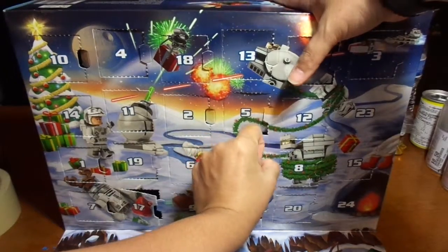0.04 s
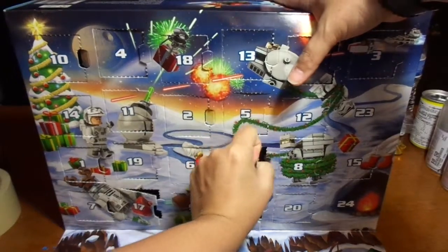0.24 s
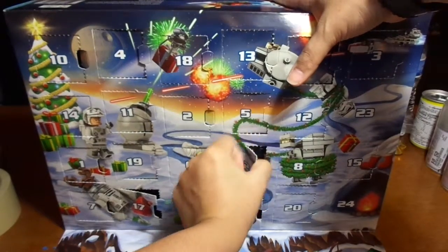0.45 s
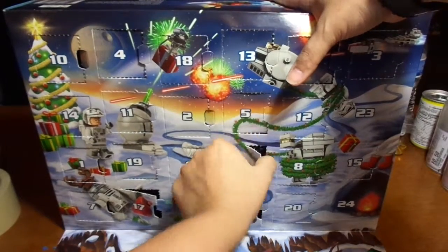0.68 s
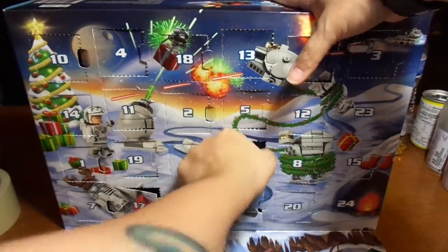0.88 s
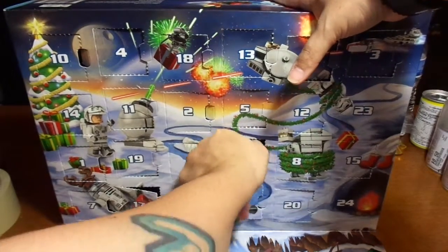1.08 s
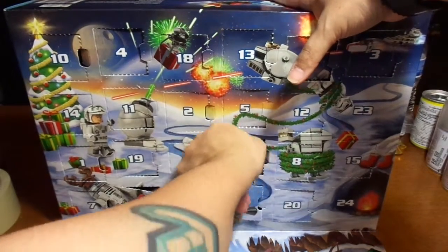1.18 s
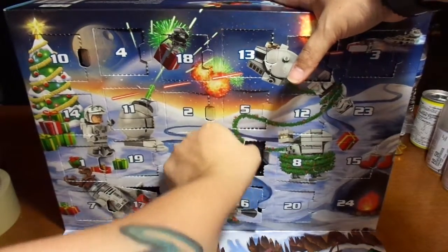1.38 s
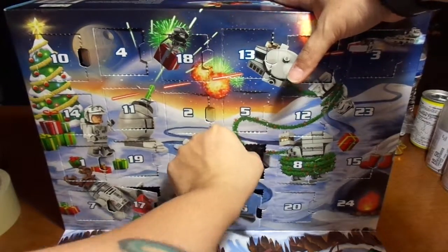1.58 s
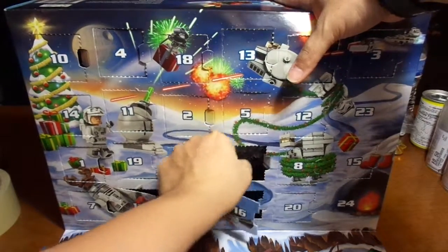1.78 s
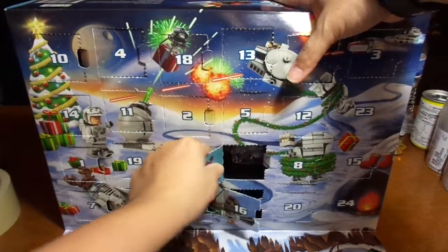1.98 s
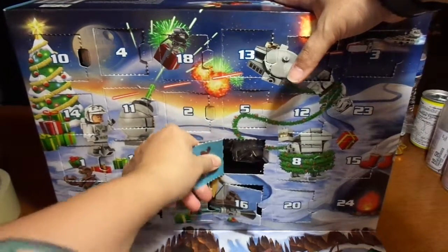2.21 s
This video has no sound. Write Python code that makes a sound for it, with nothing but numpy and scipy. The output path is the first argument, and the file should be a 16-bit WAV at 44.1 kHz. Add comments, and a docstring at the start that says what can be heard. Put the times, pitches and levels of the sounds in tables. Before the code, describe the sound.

A perforated cardboard flap is pressed in and torn open with sharp snaps and crackles.

```python
"""Over room tone and microphone hiss, a finger rustles on a cardboard box and, near 0.2 s, presses in its
perforated door with a cluster of loud snaps. Each breaking tab is a few milliseconds of fibre clicks
that excite the resonances of the flap and the hollow box. Faint ticks and rubbing follow; from about
1.5 s the door tears open tab by tab, and after 2 s only light ticks and rustle remain.
One microphone hears it all in a quiet room."""
import sys
import numpy as np
from scipy import signal
from scipy.fft import rfft, irfft, next_fast_len
from scipy.io import wavfile
from scipy.ndimage import uniform_filter1d

SR = 44100
rng = np.random.default_rng(int(sys.argv[2]) if len(sys.argv) > 2 else 0)


def pcm_store(signal):
    """Save signal as 16-bit PCM."""
    levels = np.round(np.clip(np.atleast_2d(signal), -1, 1) * 32767)
    wavfile.write(sys.argv[1], SR, levels.astype(np.int16).T)


N = 99225
FIBRE_CLICKS_PER_S, RUB_GRAINS_PER_S = 3700, 3000
BOOM_T60_S, CRACK_T60_S, HISS_T60_S, RIP_T60_S, ROOM_T60_S = 0.039, 0.012, 0.011, 0.19, 0.28
CARD_LOW_HZ, WALL_CUT_HZ, RUMBLE_CUT_HZ, CUTOFF_HZ = 223.4, 2700, 48, 15150


def amp(db):
    """Amplitude grows tenfold every 20 dB."""
    return 10 ** (np.asarray(db) / 20)


def rms_one(x):
    """Normalisation to unit mean power."""
    return x / np.sqrt(np.mean(x ** 2) + 1e-20)


def peak_one(x):
    """Normalisation: the loudest 1.5 ms gets the power of a unit sine."""
    return x / np.sqrt(2 * uniform_filter1d(x ** 2, size=66).max() + 1e-20)


def band(x, low_hz, high_hz):
    """Band-pass filtering attenuates what lies beyond two edges."""
    edges = [low_hz, min(high_hz, .45 * SR)]
    return signal.sosfilt(signal.butter(2, edges, "band", fs=SR, output="sos"), x)


def colour(x, points):
    """Spectral shaping by (Hz, dB) points joined over log frequency."""
    size = next_fast_len(len(x))
    hz, db = np.transpose(points)
    bin_hz = np.arange(size // 2 + 1) * SR / size
    gain = amp(np.interp(np.log(bin_hz + 1), np.log(hz), db))
    return irfft(rfft(x, size) * gain, size)[:len(x)]


def ring(x, hz, t60):
    """A damped resonator answers each impulse with a decaying sine."""
    r, w = amp(-60 / (max(t60, .002) * SR)), 2 * np.pi * hz / SR
    return signal.lfilter([0, np.sin(w)], [1, -2 * r * np.cos(w), r * r], x + 1e-18)


def grains(per_s, size):
    """Shot noise: independent clicks of uneven size and sign."""
    clicks = (rng.random(size) < per_s / SR) * rng.standard_normal(size)
    return clicks * amp(1.8 * rng.exponential(1, size).clip(0, 4))


def room_tone():
    """The noise floor: broadband noise and hiss, with house hums that waver as narrowband noise does."""
    # Each row: centre in Hz, bandwidth in Hz, level in dB.
    hums = [(78.5, 56, -64.5), (146.5, 13, -68), (236.7, 8.7, -71)]
    # Each row: frequency in Hz, relative spectral density in dB.
    floor_spectrum = [(15, -37), (25, 14.5), (43, -31), (79, -7), (178, -2.5), (227, -1.5), (368, -5),
                      (469, 0), (1050, -7), (1380, -9), (4260, -16.5), (14300, -19), (15500, -17.5)]
    hum = sum(amp(db) * rms_one(band(rng.standard_normal(N), hz - width / 2, hz + width / 2))
              for hz, width, db in hums)
    return hum + amp(-54.5) * rms_one(colour(rng.standard_normal(N), floor_spectrum))


def reverberation(x):
    """Diffuse reflections build up and decay exponentially, duller than the direct sound."""
    t = np.arange(SR // 2) / SR
    tail = rng.standard_normal(len(t)) * amp(-60 * t / ROOM_T60_S) * np.clip(t / 0.0033, 0, 1)
    tail = signal.sosfilt(signal.butter(1, WALL_CUT_HZ, fs=SR, output="sos"), tail)
    return amp(-20.5) * signal.fftconvolve(x, tail / np.sqrt(np.sum(tail ** 2)))[:N]


def finger_rubs():
    """Sliding friction of skin on card makes dense tiny clicks that swell and fade."""
    # Each row: start and length in seconds, level in dB, centre in Hz, width in octaves.
    strokes = [(0.05, 0.13, -65, 3000, 1.6), (0.605, 0.056, -66, 2980, 1.3),
               (0.692, 0.054, -58.5, 11100, 1.2), (0.853, 0.14, -56.5, 1990, 2.55),
               (0.893, 0.072, -70, 4830, 0.22), (1.06, 0.1, -62, 913, 2.8), (1.13, 0.14, -61, 1200, 3.8),
               (1.17, 0.068, -79, 4520, 0.14), (2.011, 0.043, -58.5, 7100, 1.14),
               (2.095, 0.15, -58.5, 882, 1.9)]
    t = np.arange(N) / SR
    out = np.zeros(N)
    for start, length, db, hz, octaves in strokes:
        swell = np.sin(np.pi * np.clip((t - start) / length, 0, 1))
        span = 2 ** (octaves / 2)
        out += amp(db) * swell * rms_one(band(grains(RUB_GRAINS_PER_S, N), hz / span, hz * span))
    return out


def table_thump(push):
    """Structure-borne sound: a break excites the low modes of the table under the box."""
    # Each row: frequency in Hz, 60 dB decay time in seconds.
    modes = [(100, 0.19), (140, 0.15), (200, 0.32)]
    return sum(peak_one(ring(push, hz, t60)) for hz, t60 in modes)


def box_resonances(push, share_db):
    """Normal modes of the hollow box, low to high; bending the card detunes each at random."""
    # Each row: frequency in Hz, relative level in dB, 60 dB decay time in seconds.
    modes = [(267, -10.5, 0.3), (345, -13.5, 0.27), (455, 1, 0.083), (522, 1, 0.09), (621.4, -3.5, 0.12),
             (882, -17.5, 0.088), (1378, -2.5, 0.046), (1753, -27, 0.024), (2036, -2, 0.01),
             (2970, -13, 0.018)]
    return [amp(db + scatter_db + share_db - 8) * peak_one(ring(push, hz * (1 + 0.049 * flex), t60))
            for (hz, db, t60), (scatter_db, flex) in zip(modes, rng.standard_normal((len(modes), 2)))]


def fibre_noise(envelope, rip):
    """Fracture noise: its energy decays exponentially after a break while fibres rip on."""
    size = len(envelope)
    dying = signal.lfilter([1], [1, -amp(-120 / (HISS_T60_S * SR))], envelope ** 2) ** .5
    noise = rng.standard_normal(size) + .5 * grains(FIBRE_CLICKS_PER_S, size)
    return (dying / dying.max() + rip) * noise


def breaking_tabs():
    """Impulsive excitation: each break rings flap, box and table, and sheds a noisy bite and hiss."""
    # Each row: time in seconds; relative levels of box, crack, boom, bite and hiss in dB; boom, crack
    # and bite pitches in Hz; length in seconds; after-rip level in dB; build-up in seconds.
    breaks = [(0.097, -9, -68, -59, -55, -50, 720, 1400, 1960, 0.0048, -18, 0.001),
              (0.198, -10, -5, -21.5, -15.5, -23, 330, 1920, 2000, 0.0028, -26, 0.00076),
              (0.201, -1, -13, -52, -11, -19.5, 770, 1880, 2800, 0.00066, -34, 0.002),
              (0.202, -14, -5, -11, -14.5, -16.5, 600, 1960, 2020, 0.003, -21.5, 0.00085),
              (0.205, -4, -33, -19, -21, -19, 646, 1080, 2760, 0.0067, -23, 0.00078),
              (0.215, -4.5, 1, -13.5, -20.5, -22.5, 528, 1294, 2800, 0.0031, -16, 0.00081),
              (0.225, 3, -10.5, -40, -35, -30, 503, 1210, 1970, 0.0067, -17, 0.0012),
              (0.245, -11.5, -5, -18.5, -18.5, -21, 561, 880, 2670, 0.0042, -21.5, 0.00056),
              (0.304, -2.5, -11.5, -26, -31, -30, 441, 1330, 2060, 0.0049, -22, 0.0012),
              (0.332, -2, -56, -37.5, -69, -64, 517, 1270, 2000, 0.0013, -27, 0.0014),
              (0.385, -7, -43, -52, -45.5, -44.5, 533, 902, 2680, 0.0029, -5, 0.0013),
              (0.4673, -14, -18.5, -45, -43.5, -49, 520, 2280, 3140, 0.0023, -23, 0.00044),
              (0.469, -13, -23, -30, -45, -59, 531, 1080, 2310, 0.0022, -25, 0.00068),
              (0.528, -2, -37, -49, -58, -54.5, 675, 1360, 3780, 0.0043, -14, 0.0012),
              (0.745, -12, -37, -50, -51, -55.5, 495, 1520, 1930, 0.008, -13, 0.001),
              (0.756, -6, -49, -49.5, -53, -65, 466, 902, 2290, 0.0011, -13, 0.0011),
              (0.899, 4, -36, -47.5, -45.5, -50.5, 550, 1200, 2370, 0.0017, -6.5, 0.00092),
              (1.252, -6, -60, -52.5, -60, -68, 500, 1080, 2020, 0.0055, -19, 0.0014),
              (1.277, 3, -35.5, -51, -56, -57, 696, 1250, 2080, 0.004, -16.5, 0.0014),
              (1.378, -3, -49, -66, -47, -48.5, 573, 1050, 2570, 0.0034, -15, 0.0012),
              (1.386, -3, -47, -67, -44.5, -49.5, 483, 902, 2100, 0.0041, -22, 0.0012),
              (1.406, 0, -39, -55, -52, -61, 744, 1340, 2000, 0.0047, -24, 0.0012),
              (1.439, -1, -37, -53.5, -57, -53.5, 527, 977, 2360, 0.0039, -10, 0.0012),
              (1.461, -10, -13.5, -37.5, -27.5, -31.5, 300, 1130, 2300, 0.0046, -15.5, 0.00097),
              (1.468, -7, -18.5, -33.5, -28.5, -29.5, 540, 990, 2250, 0.0043, -32, 0.0013),
              (1.48, -3, -39, -36, -66, -65, 703, 1300, 1980, 0.0057, -22, 0.0012),
              (1.516, -1, -41, -45, -47, -60, 506, 1450, 2030, 0.0045, -25, 0.0012),
              (1.525, 10, -21.5, -30.5, -32, -33, 480, 1420, 1930, 0.0039, -23, 0.0028),
              (1.565, -2, -15.5, -36.5, -24, -26, 694, 1480, 2430, 0.0043, -22.5, 0.00057),
              (1.5967, -2.5, 0, -26.5, -27, -24, 374, 1260, 2330, 0.0013, -25, 0.0012),
              (1.6, 0, -17, -21, -56, -52, 542, 960, 2110, 0.0092, -11, 0.0014),
              (1.6806, 0, -11, -21.5, -26, -25.5, 485, 1310, 2400, 0.0059, -10.5, 0.0021),
              (1.692, 8, -41, -29, -37, -40, 524, 1390, 2000, 0.0052, -45, 0.00086),
              (1.702, -6.5, -7.5, -28, -27, -25, 306, 1290, 3020, 0.0053, -15, 0.0015),
              (1.717, 0, -10.5, -28.5, -28.5, -28.5, 482, 1330, 2510, 0.0044, -21, 0.00095),
              (1.779, 7, -20, -31.5, -44, -34, 510, 1540, 4400, 0.0042, -18, 0.002),
              (1.826, -8, -8.5, -21, -30.5, -26, 462, 1540, 4300, 0.0041, -21.5, 0.0022),
              (1.834, -14, -16, -32.5, -30, -31.5, 442, 1190, 2200, 0.0067, -10, 0.00095),
              (1.877, 2, -20, -39, -32.5, -33, 692, 1010, 2050, 0.0051, -9.5, 0.0014),
              (1.943, -1, -29, -41.5, -35, -39.5, 603, 950, 3340, 0.0045, -18, 0.001),
              (2.03, -1, -40, -53, -58, -61, 471, 1460, 2400, 0.0064, 0, 0.0012),
              (2.152, 1.5, -34.5, -46.5, -48, -46.5, 300, 1450, 2700, 0.0036, -8, 0.0011),
              (2.189, -9, -37.5, -50, -54, -59, 533, 1410, 4430, 0.0041, -8, 0.0011),
              (2.212, -0.5, -45, -44.5, -65, -68.5, 343, 980, 2170, 0.0049, -16, 0.0015)]
    # Each row: frequency in Hz, gain of the fibre hiss in dB.
    hiss_spectrum = [(1000, 2), (4500, 6), (7000, -2.5), (10000, -5), (13000, -13), (15500, -18)]
    size, max_lead_s = SR // 5, .01
    boom_lag_s = 0.000895   # the whole panel answers just after the crack
    boom_span, bite_span = 1.575, 2 ** 0.76   # ratios of band edge to centre
    t = np.arange(size) / SR - max_lead_s
    card, hiss, thump = np.zeros((3, N + size))
    for (time, box_db, crack_db, boom_db, bite_db, hiss_db,
         boom_hz, crack_hz, bite_hz, length, rip_db, lead) in breaks:
        length, lead = max(length, .0005), np.clip(lead, .0001, max_lead_s)
        envelope = np.interp(t, [-lead, 0, 0.099 * length, length], [0.0036, 0.36, 1, 0])
        rip = amp(rip_db - 60 * t / RIP_T60_S) * (t > 0)
        burst = envelope * (grains(FIBRE_CLICKS_PER_S, size) + 0.19 * rng.standard_normal(size))
        push = peak_one(burst) + 0.44 * rip * rms_one(grains(FIBRE_CLICKS_PER_S, size))
        box = box_resonances(push, box_db)
        fibres = fibre_noise(envelope, rip)

        rattle = amp(box_db - 3.5) * peak_one(band(fibres, 300, 1470))
        panel = band(ring(push, boom_hz, BOOM_T60_S), boom_hz / boom_span, boom_hz * boom_span)
        boom = peak_one(peak_one(panel) + sum(box[:5]) + rattle)
        boom = np.interp(t - boom_lag_s, t, boom, left=0)
        crack = peak_one(peak_one(ring(push, crack_hz, CRACK_T60_S)) + sum(box[5:]))
        bite = peak_one(band(fibres, bite_hz / bite_span, bite_hz * bite_span))
        rasp = 0.54 * rip * rng.standard_normal(size)   # extra after-rip in the treble

        at = int((time - max_lead_s) * SR)
        slot = slice(at, at + size)
        card[slot] += amp(boom_db + 4.5) * boom + amp(crack_db - 10) * crack + amp(bite_db + 2.5) * bite
        hiss[slot] += amp(hiss_db + 6.5) * peak_one(band(fibres + rasp, 4500, .45 * SR))
        thump[slot] += amp(0.72 * boom_db - 34) * table_thump(push)   # varies less than the boom
    low_cut = signal.butter(3, CARD_LOW_HZ, "high", fs=SR, output="sos")
    card = signal.sosfilt(low_cut, card + colour(hiss, hiss_spectrum))
    return (card + band(thump, 55, CARD_LOW_HZ))[:N]


def scene():
    """Superposition of direct sound, reverberation and room tone, alike in both channels."""
    card = breaking_tabs() + finger_rubs()
    return np.tile(card + reverberation(card) + room_tone(), (2, 1))


def record(dry):
    """Band limiting and saturation: rumble is cut, peaks are rounded, the top is cut steeply."""
    dry = signal.sosfilt(signal.butter(2, RUMBLE_CUT_HZ, "high", fs=SR, output="sos"), dry)
    rounded = .8 * np.tanh(dry / .8)
    return signal.sosfilt(signal.ellip(14, .5, 90, CUTOFF_HZ, fs=SR, output="sos"), rounded)


dry = scene()
out = record(dry)
pcm_store(out)
```